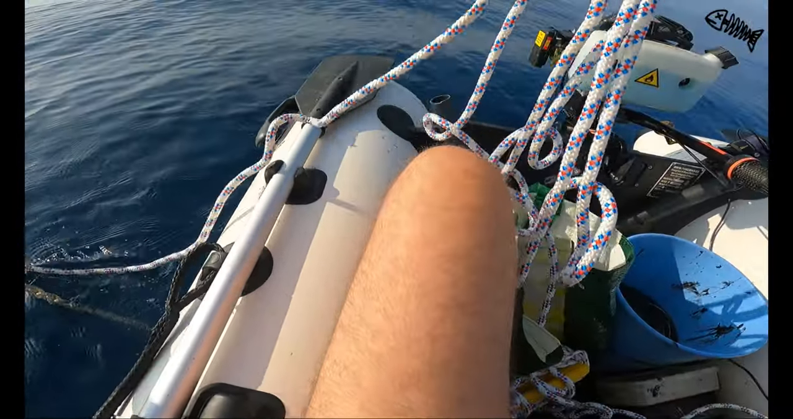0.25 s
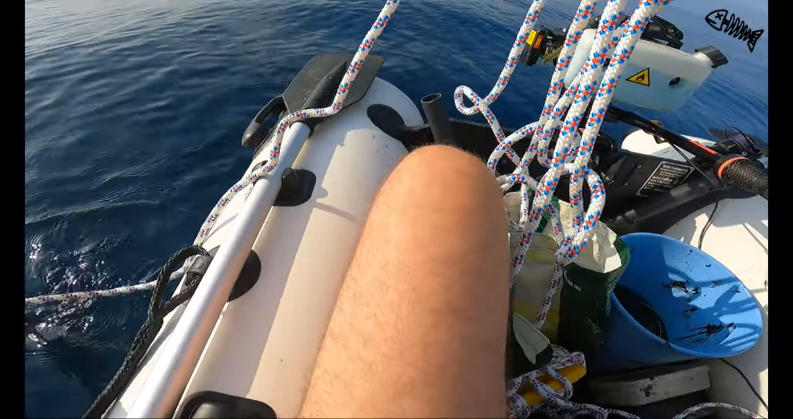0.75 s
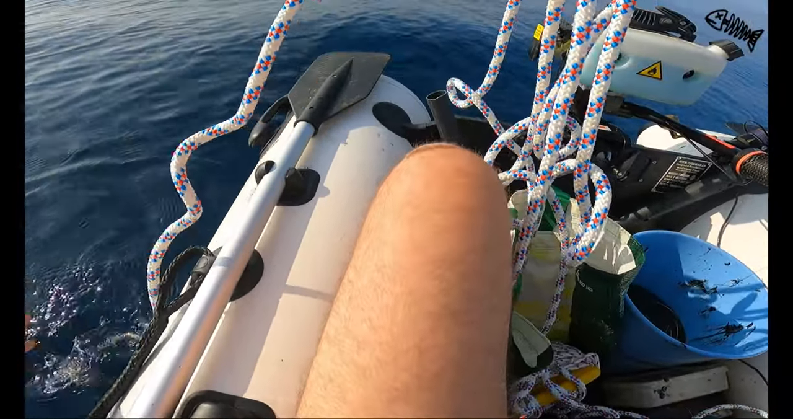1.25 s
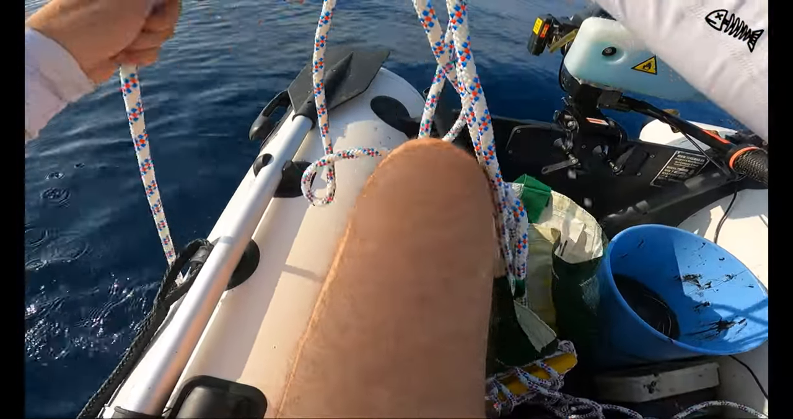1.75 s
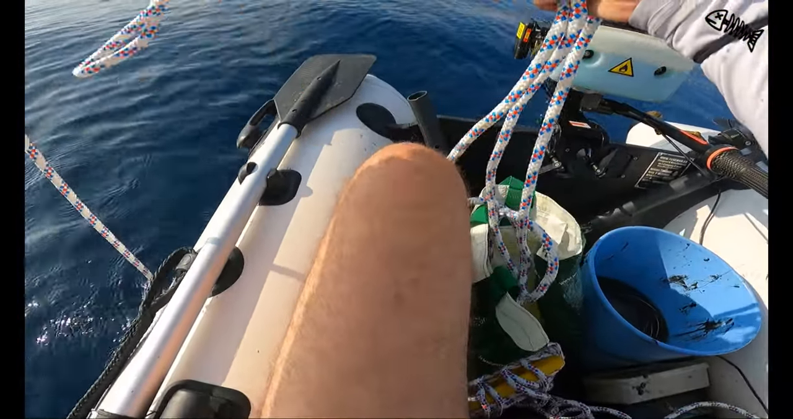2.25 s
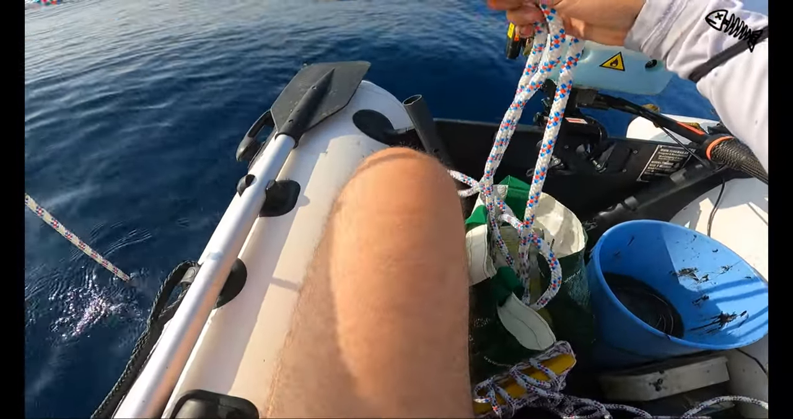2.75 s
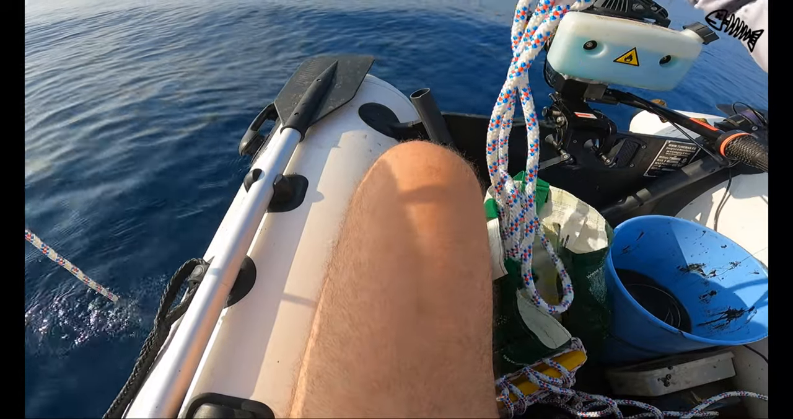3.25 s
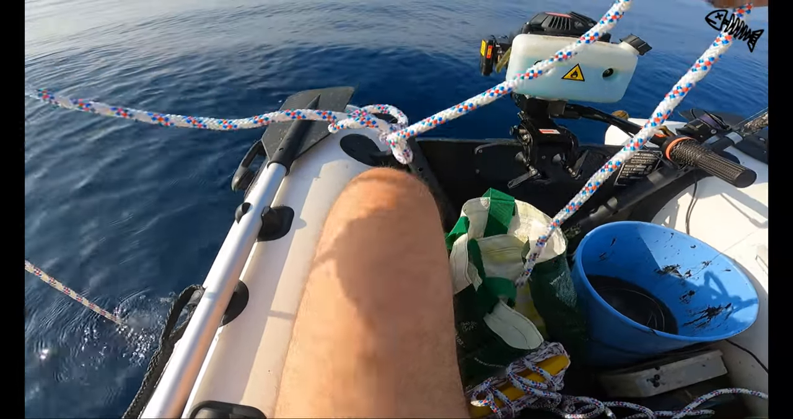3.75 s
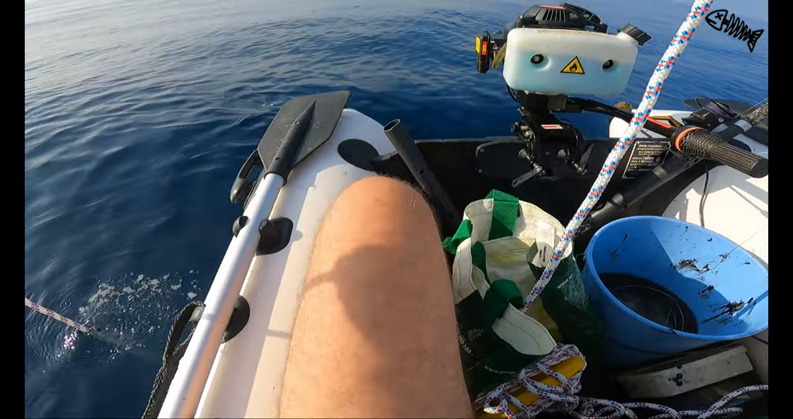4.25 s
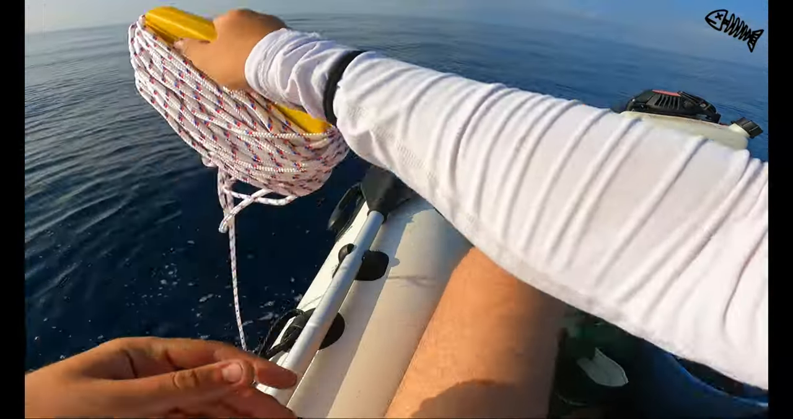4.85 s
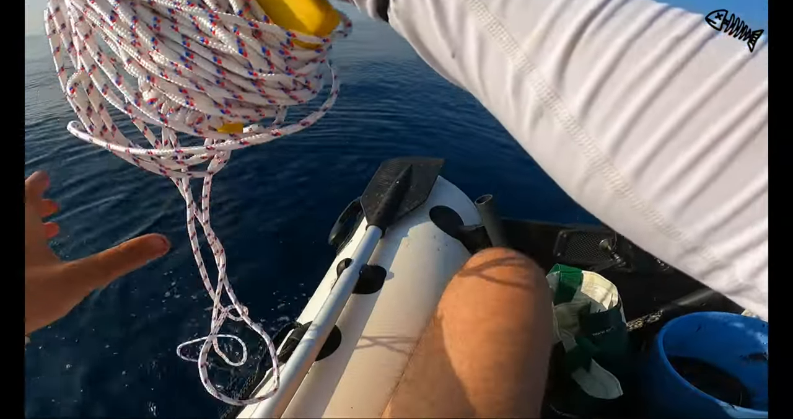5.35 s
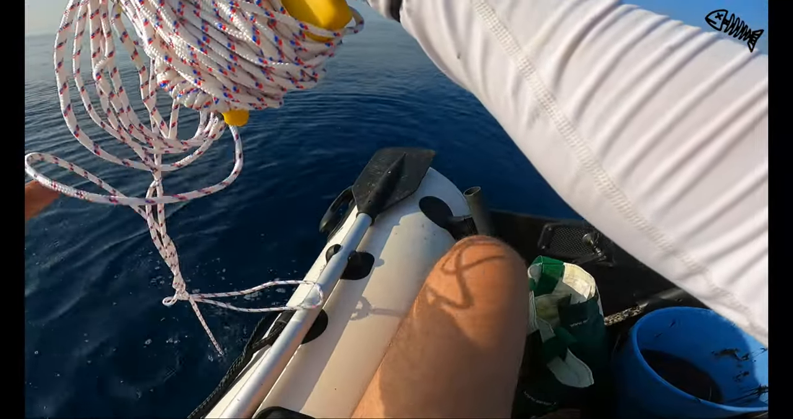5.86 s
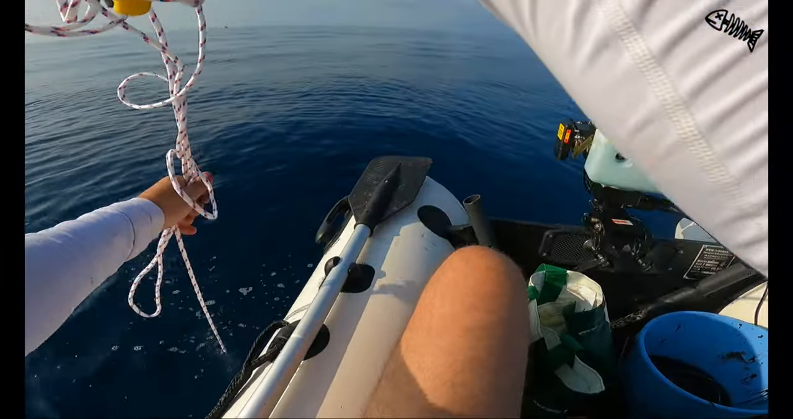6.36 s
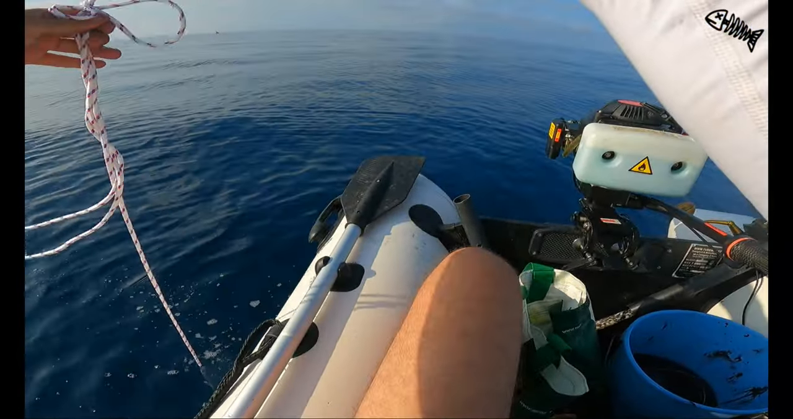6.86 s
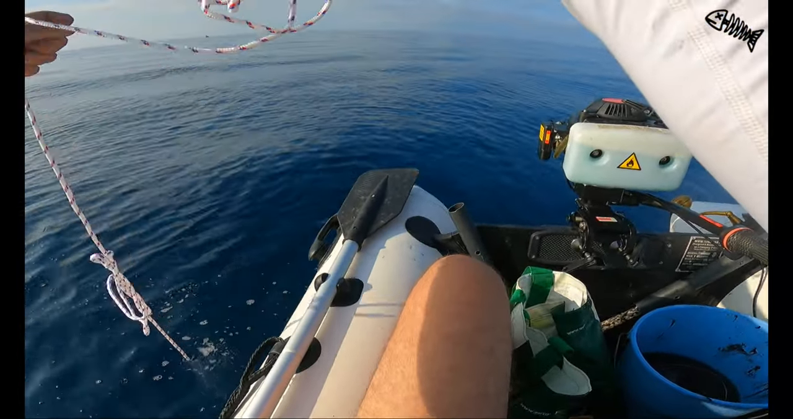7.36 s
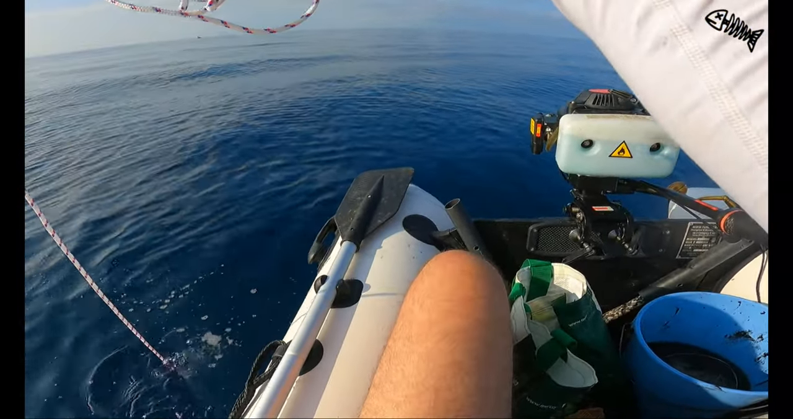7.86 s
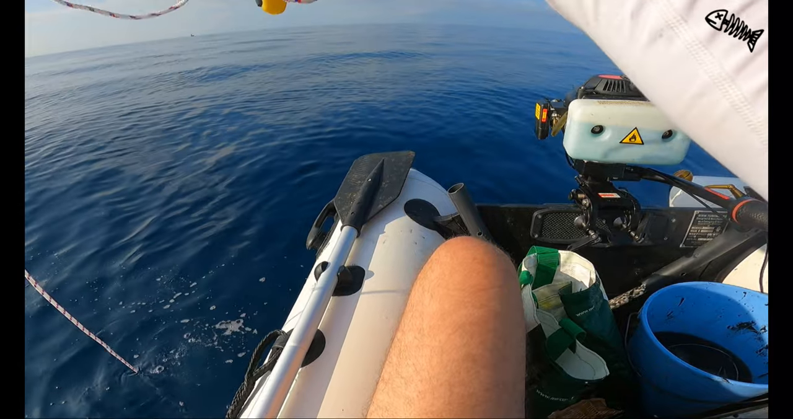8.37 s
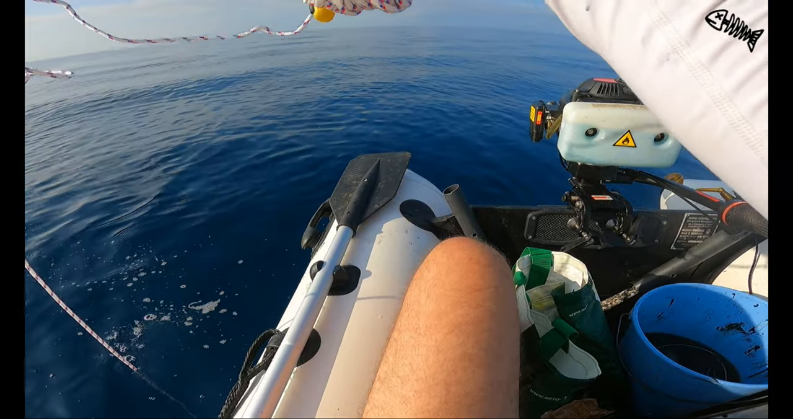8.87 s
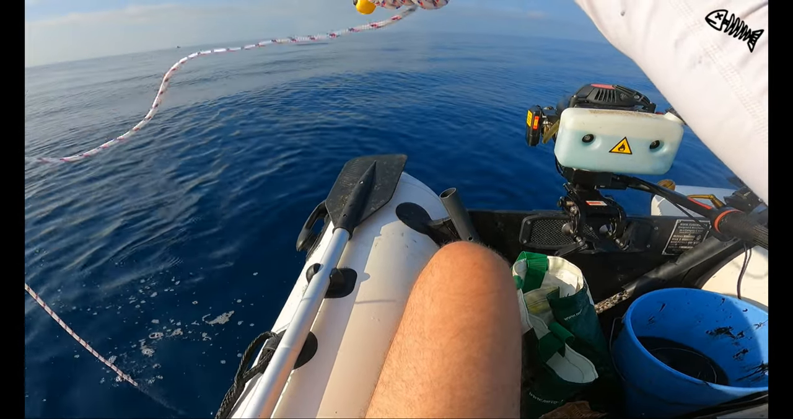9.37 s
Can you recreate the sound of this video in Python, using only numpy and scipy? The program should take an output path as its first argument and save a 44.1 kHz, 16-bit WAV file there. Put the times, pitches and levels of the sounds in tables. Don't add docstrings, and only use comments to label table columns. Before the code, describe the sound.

Close outdoor pickup on a small inflatable boat at sea, wind rumbling softly on the microphone throughout. At 0.3 s a loud, hollow rubbery thump lands with a wet slap; a sharp tick follows at 0.6, another low thump at 0.7, then a run of small plops and drips to 1.2. From 1.3 to 1.7 slaps, splashes and thumps crowd together, leading into a throaty bubbling gurgle that peaks near 1.9 and dies by 2.1. Wet rope hisses brightly from 1.8, checked briefly at 2.8, 3.9 and 4.5, with hollow washes on the hull at 3.2-3.6. Plopping splashes and a thump burst at 4.9-5.2, another at 5.6. Wind pops at 6.05 and hard at 6.5, beside a fresh hiss. Slaps and spray at 7.5-7.9, wind pops at 7.9 and strongest at 8.5, then faint rope hiss to 9.6.

```python
import sys
import numpy as np
from scipy import signal
from scipy.fft import rfft, irfft, next_fast_len
from scipy.io import wavfile
from scipy.ndimage import uniform_filter1d, map_coordinates

SR = 44100
rng = np.random.default_rng(int(sys.argv[2]) if len(sys.argv) > 2 else 0)


def log_audio(samples):
    frames = np.atleast_2d(samples).T
    limited = np.clip(frames, -1, 1)
    pcm = np.round(limited * 32767).astype(np.int16)
    wavfile.write(sys.argv[1], SR, pcm)


def amplitude_ratio(level_db):
    exponent = np.asarray(level_db, float) / 20
    return 10 ** exponent


N = 423801

# freq_hz, density_db (dB per Hz)
SLOSH_SPECTRUM = [(250, -38), (500, -6), (1000, 3.5), (1800, 3), (2600, -11.5), (5000, -63)]
# freq_hz, density_db (dB per Hz)
HULL_SPECTRUM = [(90, -15), (160, 1), (280, -4), (450, -10), (800, -25.5), (1500, -66)]
# freq_hz, correlation (0 to 1)
PORT_LIKENESS = [(60, 0.9), (180, 0.44), (550, 0.24), (1650, 0.56), (4970, 0.85), (15000, 0.55)]


def unit(x):
    return x / np.sqrt(np.mean(x ** 2) + 1e-20)


def along(points, hz):
    f, v = np.transpose(points)
    return np.interp(np.log(hz + 1), np.log(np.abs(f) + 1), v)


def curves(rows):
    s, *cols = np.transpose(rows)
    return [np.interp(np.arange(N) / SR, s, c) for c in cols]


def wobble(rate):
    knots = rng.standard_normal(int(N * 400 / SR) + 4)
    return map_coordinates(knots, [np.arange(N) * min(rate, 400) / SR])


def filtered(x, response):
    m = next_fast_len(N + SR // 2)
    return irfft(rfft(x, m) * response(np.fft.rfftfreq(m, 1 / SR)), m)[..., :N]


def rush(spectrum, alike, patchy_db):
    z = signal.stft(rng.standard_normal((2, N)), nperseg=512)[2]
    field = uniform_filter1d(rng.standard_normal(z.shape[1:]), size=5, axis=0)
    field = uniform_filter1d(field, size=10, axis=1)
    pair = signal.istft(z * amplitude_ratio(patchy_db * unit(field)), nperseg=512)[1][:, :N]

    def mid_side(hz):
        turn = np.arccos(np.clip(along(alike, hz), -1, 1)) / 2
        return amplitude_ratio(along(spectrum, hz)) * [np.cos(turn), np.sin(turn)]

    mid, side = filtered(pair, mid_side)
    return unit(np.array([mid + side, mid - side]))


def pings(s, db, hz, t60, glide, rise_cycles, size):
    t = np.arange(size) / SR
    hz, t60, db = hz[:, None], t60[:, None], db[:, None]
    slide = glide * t60 * (t / t60 - 1 + np.exp(-t / t60 * 3) / 3 + 2 / 3)
    phase = 2 * np.pi * hz * (t + slide)
    envelope = amplitude_ratio(db - 60 * t / t60) * (1 - np.exp(-t * hz / rise_cycles))
    shape = envelope * np.sin(phase - phase[:, :1])
    at = np.round(s * SR).astype(int)[:, None] + np.arange(size)
    return np.bincount(at.ravel(), shape.ravel(), N + size)[:N]


def bubbles(count, hz_mid, spread, cycles, scatter_db):
    draw = rng.random((count, 4))
    hz = hz_mid * np.exp(spread * (draw[:, 1] + draw[:, 2] - 1))
    db = -scatter_db * np.log(0.07 + draw[:, 3])
    return unit(pings(draw[:, 0] * N / SR, db, hz, cycles / hz, glide=0.14, rise_cycles=0.23, size=640))


def wind():
    # start_s, peak_db
    eddies = [(.05, -29), (.55, -31.5), (1.0, -29), (1.9, -26), (2.63, -24.5), (2.86, -31.5), (3.15, -27),
              (3.26, -19), (3.39, -26), (3.822, -31), (4.12, -32), (4.57, -21.5), (4.92, -25.5),
              (6.05, -31.5), (6.3, -29.5), (6.44, -28), (6.58, -24), (7.34, -24), (7.55, -30), (7.78, -29),
              (8.018, -19.5), (8.2, -35), (8.485, -21.5), (9.06, -34), (9.48, -31)]
    # start_s, peak_db, width_s, lean_rad (0 a push, 1 suck then push)
    pops = [
        (4.107, -19.5, 0.0024, -0.5),
        (5.956, -24, 0.0024, 4),
        (6.053, -16.5, 0.0015, 0.5),
        (6.178, -20.5, 0.0026, 1.5),
        (6.506, -5.5, 0.0016, -0.5),
        (7.938, -10, 0.002, 1),
        (8.514, -4, .0011, 1.5),
    ]
    # freq_hz, density_db (dB per Hz)
    buffet_spectrum = [(10, 0), (22, 8), (40, 3.5), (90, -7), (140, -13.5), (260, -34.5), (500, -70.5)]
    breeze_db, wake_db = -51.5, -15.5
    eddy_s, wake_s = 0.042, 0.31
    s, db = np.transpose(eddies)
    knots = np.arange(0, N / SR, 1 / 500)

    def bell(half_s):
        return np.exp(-((knots - s[:, None]) / half_s) ** 2)

    gusts = bell(eddy_s) + amplitude_ratio(2 * wake_db) * bell(wake_s)
    power = amplitude_ratio(2 * breeze_db) + np.sum(amplitude_ratio(2 * db[:, None]) * gusts, axis=0)
    buffet, = curves(np.transpose([knots, np.sqrt(power)]))
    lumps = amplitude_ratio(1.5 * wobble(25))
    out = buffet * unit(lumps * rush(buffet_spectrum, [(30, 0.87), (300, 0.99)], patchy_db=3.5))
    t = np.arange(-2048, 2048) / SR
    for start_s, peak_db, width_s, lean in pops:
        u = (t - .007) / width_s
        push = (1 - 0.26 * u ** 2) * np.cos(lean)
        suck = 0.89 * u * np.sin(lean)
        at = round(start_s * SR)
        out[:, at - 2048:at + 2048] += amplitude_ratio(peak_db + 1) * (push + suck) * np.exp(-.35 * u ** 2)
    return out


def running():
    # start_s, hiss_db, grip (0 loose, 1 tight), palm (-1 deep, 0 flat, 1 shallow cup)
    hand = [(0, -57, 0.86, -0.12), (1.45, -60.5, 1, -0.72), (1.8, -38.5, 0.42, -0.16), (2.0, -38, 1, -0.19),
            (2.45, -46, 0.88, -0.1), (3.5, -45.5, 0.66, -0.3), (4.45, -48, 0.61, -0.53),
            (4.8, -51.5, 0.69, -0.54), (5.0, -62.5, 0.23, 0.074), (5.55, -56, 0.14, -0.25),
            (6.34, -49, 0.039, 0.2), (6.42, -38.5, 0.89, -0.28), (6.8, -48, 0.41, -0.099),
            (7.2, -45.5, 0.23, 0.7), (7.8, -50, 0.049, -0.25), (8.7, -55, 0.62, -0.4),
            (9.2, -52.5, 0.94, 1), (9.61, -53.5, 0.81, 0.44)]
    # start_s, length_s, loss_db
    stops = [
        (0.178, 0.2, 6.5),
        (0.965, 0.077, 14),
        (2.824, 0.27, 11),
        (3.853, 0.24, 13.5),
        (4.2, 0.11, 6.5),
        (4.484, 0.22, 15),
        (6.414, 0.085, 13),
        (7.247, 0.074, 16.5),
        (7.854, 0.49, 20.5),
        (8.4, 0.3, 7.5),
    ]
    clamp_s, let_go_s = 0.056, 0.027
    creep = 0.79
    hiss_db, grip, palm = curves(hand)
    t = np.arange(N) / SR
    for s, length, loss_db in stops:
        creep_end = s + max(length - let_go_s, clamp_s + .001)
        held = np.interp(t, [s, s + clamp_s, creep_end, s + length], [0, 1, creep, 0])
        hiss_db = hiss_db - loss_db * held
    return hiss_db, grip, palm


def rope():
    # freq_hz, density_db (dB per Hz)
    tight_spectrum = [(600, -40), (1000, -12.5), (1700, -7), (2600, -7), (4500, -1), (7000, -7.5),
                      (12100, -19.5), (16000, -37)]
    # freq_hz, density_db (dB per Hz)
    loose_spectrum = [(530, -4), (900, -10), (1790, -21), (2890, -4), (4860, 3), (6720, 8.5), (9770, 2.5),
                      (11000, -4.5), (12100, 1), (14500, -7), (16000, -46)]
    # freq_hz, width_hz
    hollows = [(2550, 880), (4650, 2030)]
    # start_s, spacing_hz (between bright bands), bounce_db
    bounce = [
        (1.75, 2000, -9),
        (2.1, 1690, -3),
        (2.85, 1780, -3),
        (3.5, 1750, -11),
        (4.1, 2230, -4),
        (4.45, 2520, -4),
        (5.0, 2400, -20),
    ]
    hiss_db, grip, palm = running()
    rings = np.maximum(-palm, 0.14 * palm), np.maximum(palm, -.4 * palm)
    grip = np.clip(grip, 0, 1)
    tight = rush(tight_spectrum, PORT_LIKENESS, patchy_db=1.8)
    loose = rush(loose_spectrum, PORT_LIKENESS, patchy_db=1.8)
    out = np.sqrt(grip) * tight + np.sqrt(1 - grip) * loose
    spacing_hz, bounce_db = curves(bounce)
    late = np.arange(N) - SR / spacing_hz
    dulled = amplitude_ratio(bounce_db) * filtered(out, lambda f: 1 / (1 + (f / 3900) ** 4))
    out = unit(out + [map_coordinates(port, [late], order=3) for port in dulled])
    for (hz, width), ring in zip(hollows, rings):
        band = [(hz - width, -40), (hz - width / 2, -6), (hz, 0), (hz + width / 2, -6), (hz + width, -40)]
        out += ring * rush(band, PORT_LIKENESS, patchy_db=1.5)
    return amplitude_ratio(hiss_db + 1.24 * wobble(150)) * out


def water():
    # start_s, slosh_db
    stir = [(0, -56), (0.27, -67), (0.4, -52.5), (1.0, -53), (1.2, -58.5), (1.75, -42.5), (2.05, -53),
            (2.6, -63.5), (3.1, -51.5), (3.6, -48.5), (3.92, -57.5), (4.8, -50), (5.7, -62.5),
            (6.45, -49.5), (7, -62), (9.61, -71)]
    # freq_hz, density_db (dB per Hz)
    far_sea = [(900, -4), (1500, 2), (2500, -17), (10000, -2), (16000, -54)]
    slosh_db, = curves(stir)
    lap_db = -52.5 + 0.38 * (slosh_db - slosh_db.mean())
    slosh = unit(amplitude_ratio(1.65 * wobble(70)) * rush(SLOSH_SPECTRUM, [(500, 0.38)], patchy_db=3.5))
    fizz = bubbles(count=500, hz_mid=1300, spread=.8, cycles=14, scatter_db=1.5)
    lap = unit(amplitude_ratio(2.5 * wobble(40)) * rush(HULL_SPECTRUM, [(200, .65)], patchy_db=1))
    sea = amplitude_ratio(-70.0) * rush(far_sea, PORT_LIKENESS, patchy_db=3)
    return amplitude_ratio(slosh_db - 3.3) * (slosh + .35 * fizz) + amplitude_ratio(lap_db) * lap + sea


def tube():
    # start_s,
    # peak_db, pitch_hz
    thumps = [(0.072, -29.5, 342), (0.295, 0, 235), (0.498, -37, 378), (0.73, -17.5, 300), (1.38, -32, 444),
              (1.671, -23.5, 375), (5.62, -53, 304), (0.72, -6.5, 169), (1.414, -10.5, 240),
              (1.445, -14.5, 414), (1.585, -16, 293), (1.656, -17.5, 326), (1.705, -19.5, 350),
              (1.753, -15.5, 340), (1.833, -6.5, 275), (1.947, -16, 325), (2.335, -28.5, 198),
              (2.625, -29.5, 204), (2.996, -32, 190), (3.223, -24, 170), (3.279, -21.5, 280),
              (3.482, -28, 265), (4.007, -32, 181), (4.149, -33.5, 313), (4.554, -37, 161),
              (5.908, -40, 304), (6.359, -35.5, 334), (7.623, -37.5, 293), (8.19, -38.5, 183),
              (8.747, -35.5, 175), (2.093, -31.5, 288), (4.946, -10.5, 435), (5.068, -21, 333),
              (5.5958, -18, 387), (5.791, -32.5, 297), (5.852, -35.5, 314), (7.479, -28.5, 550),
              (7.746, -32.5, 460), (7.918, -20, 363)]
    s, db, hz = np.transpose(thumps)
    t60 = np.clip(0.018 * (1.5 - 0.0051 * db), .01, .2)
    skin = pings(s, db + 8.5, 1.275 * hz, t60, glide=-0.53, rise_cycles=0.56, size=6144)
    skin = filtered(skin, lambda f: (1j * f / (1j * f + 95)) ** 2)
    t = np.arange(8192) / SR
    shake = np.zeros(N + len(t))
    for at, level, life in zip(s, db, t60):
        decay = amplitude_ratio(level - 60 * t / (6 * life))
        shake[round(at * SR):][:len(t)] += decay * (1 - np.exp(-t / 0.00152))
    boom = unit(filtered(rng.standard_normal(N), lambda f: amplitude_ratio(along(HULL_SPECTRUM, f))))
    return skin + amplitude_ratio(-12.0) * shake[:N] * boom


def drops():
    # start_s, peak_db, pitch_hz
    plop_rows = [(0.717, -22.5, 970), (0.962, -25.5, 740), (1.246, -28.5, 1750), (1.267, -19, 1040),
                 (1.378, -17.5, 1990), (1.504, -21.5, 970), (1.526, -22, 1110), (1.642, -23.5, 2540),
                 (2.382, -39.5, 1140), (2.675, -39, 1160), (2.83, -37.5, 510), (3.274, -23, 1250),
                 (4.947, -10, 650), (4.976, -16.5, 1115), (4.984, -15.5, 807), (5.0003, -11, 1560),
                 (5.05, -20, 1850), (5.204, -27, 1880), (5.527, -31.5, 1980), (7.653, -39.5, 706)]
    # start_s, peak_db, pitch_hz
    slap_rows = [(0.073, -22, 1150), (0.293, -10.5, 565), (0.593, -20.5, 2490), (0.7, -32, 1400),
                 (0.825, -30.5, 1110), (0.875, -32, 3260), (1.348, -16.5, 1070), (1.407, -12.5, 1760),
                 (1.615, -13, 2080), (3.603, -12, 1890), (4.15, -29, 1720), (4.66, -28.5, 1520),
                 (4.869, -23.5, 1070), (5.014, -9, 2340), (5.184, -22, 2390), (5.5766, -16, 1900),
                 (6.492, -25, 1730), (7.479, -11.5, 900), (7.805, -18, 1250), (7.831, -14, 2200),
                 (7.897, -18.5, 1480)]
    # start_s, peak_db, pitch_hz
    link_rows = [(0.582, -42, 1060), (0.624, -30, 840), (0.652, -31, 806), (0.684, -39, 800),
                 (0.729, -24.5, 1020), (0.772, -38, 705), (0.796, -34, 720), (0.856, -28, 556),
                 (0.934, -31, 735), (1.039, -40, 780), (1.066, -36.5, 870), (1.11, -41, 1150),
                 (1.14, -45, 750), (1.162, -35.5, 950), (1.204, -36.5, 784), (1.268, -28, 623),
                 (1.288, -28.5, 674)]
    # start_s, peak_db, pitch_hz
    tick_rows = [(0.4086, -29, 8500), (0.6231, -41, 7350), (0.7, -34, 6740), (0.7173, -29, 6940),
                 (1.0282, -34, 9050), (3.603, -15, 5100), (6.492, -26, 3000), (0.168, -24, 6300),
                 (0.466, -26.5, 5000), (0.5941, -5.5, 4750), (0.707, -33, 6500), (0.747, -28, 7500),
                 (0.7534, -31, 4300), (0.765, -24.5, 7400), (0.835, -33, 8950), (0.8493, -20, 7000),
                 (0.9621, -26.5, 2920), (1.077, -21, 2300), (1.113, -25, 3500), (1.108, -33, 4970),
                 (1.125, -29, 4600), (1.228, -29, 6500), (1.1827, -22, 5200), (1.2135, -25.5, 4600),
                 (1.259, -20.5, 2400), (1.415, -11, 2700), (1.552, -18, 3370), (1.5834, -11, 3830),
                 (1.6726, -17.5, 6600), (5.116, -29, 2800), (5.163, -26, 3500), (5.222, -18, 2580),
                 (5.38, -25.5, 3580), (5.397, -25, 2880), (5.6209, -13, 3150), (5.6665, -27, 4800),
                 (7.694, -26, 2770), (7.7102, -17.5, 8650), (7.739, -21.5, 6900), (7.855, -22, 3920),
                 (7.9112, -7, 6740), (8.1295, -29, 5370), (8.1718, -33.5, 5430)]
    s, db, hz = np.transpose(plop_rows + slap_rows + link_rows)
    t60 = .045 * (800 / hz) ** .35
    t60[len(plop_rows):][:len(slap_rows)] *= .4
    t60 = np.clip(t60, .006, .06)
    plops = pings(s, db - 0.5, .95 * hz, t60, glide=0.1, rise_cycles=0.15, size=1536)
    out = np.array([plops, plops])
    t = np.arange(1024) / SR
    splash = np.zeros(N + len(t))
    for at, level in zip(s, db):
        splash[round(at * SR):][:len(t)] += amplitude_ratio(level - 60 * t / 0.014)
    wash = unit(filtered(rng.standard_normal(N), lambda f: amplitude_ratio(along(SLOSH_SPECTRUM, f))))
    out += amplitude_ratio(-6.5) * splash[:N] * wash
    slap_ticks = [(s + 0.00125, db - 8, 2120 + 0.88 * hz) for s, db, hz in slap_rows]
    s, db, hz = np.transpose(tick_rows + slap_ticks)
    pan_db = 4 * rng.standard_normal((len(s), 1))[:, 0]
    spray = np.zeros((2, N + len(t)))
    for at, level, lean, pitch_hz in zip(s, db, pan_db, hz):
        burst = amplitude_ratio(level + 0.14 * (level - 0.5) - 60 * t / 0.013) * rng.standard_normal(len(t))
        dulling = (1 + 1j * np.fft.rfftfreq(len(t), 1 / SR) / (1.85 * pitch_hz)) ** 2
        burst = irfft(rfft(burst) / dulling)
        spray[:, round(at * SR):][:, :len(t)] += burst * amplitude_ratio(np.array([[lean / 2], [-lean / 2]]))
    bright = filtered(spray[:, :N], lambda f: 1 / (1 + (2200 / (f + 1)) ** 4) / (1 + (f / 13000) ** 3))
    ring = pings(s, db - 1.5, hz, 25 / hz, glide=0.016, rise_cycles=0.4, size=512)
    return out + ring + amplitude_ratio(-2) * bright


def beads():
    # start_s, peak_db, pitch_hz
    flung = [(5.5958, -17, 800), (4.79, -26, 447), (4.503, -33, 480), (0.172, -37.5, 1310),
             (0.497, -34, 1000), (1.03, -37, 3240), (5.001, -23, 3800), (1.329, -31, 2050),
             (1.349, -31, 4100), (0.732, -34.5, 3270), (1.287, -23, 1040), (1.349, -12, 1650),
             (1.404, -25, 1110), (1.408, -19.5, 3750), (1.416, -13, 2150), (1.424, -27, 3800),
             (1.432, -21, 2530), (1.445, -23, 3800), (1.456, -34, 2400), (1.505, -22, 1690),
             (1.524, -30, 4570), (1.561, -25, 4500), (1.576, -28, 2570), (1.592, -24, 2270),
             (1.619, -18.5, 4750), (4.941, -18, 2520), (4.96, -28, 5600), (5.009, -15, 1550),
             (5.027, -22, 5300), (5.031, -18.5, 885), (5.074, -18.5, 1060), (5.169, -31, 1310),
             (5.18, -27, 1800), (5.203, -33, 4700), (5.237, -38, 2500), (5.261, -35, 3480),
             (5.333, -37, 2460), (5.357, -36, 4860), (5.41, -37, 2030), (5.418, -36, 3900),
             (5.428, -37, 7000), (5.45, -38, 9200), (5.561, -32, 1700), (5.576, -16.5, 5880),
             (5.588, -21, 3030), (5.588, -33, 2100), (5.6026, -18.5, 1950), (5.7094, -38, 4950),
             (7.479, -19, 2730), (7.756, -36, 4530), (7.786, -34, 608), (7.787, -36, 3500),
             (7.8, -29, 3940), (7.875, -31, 4100), (7.884, -28, 1900), (7.897, -21, 550),
             (7.9105, -10.5, 1430)]
    # start_s, peak_db, pitch_hz
    singers = [(2.96, -43.5, 1180), (3.764, -40, 1900), (4.483, -37, 1380), (4.589, -41, 1500),
               (4.633, -39, 1490), (4.718, -35.5, 1550), (4.79, -34, 1000), (5.853, -39.5, 1060),
               (6.076, -45, 1100), (8.132, -43, 2120), (8.15, -48, 1420), (8.417, -49, 940),
               (0.962, -30, 965), (1.394, -27, 2000), (1.396, -24, 1100), (1.424, -24, 1750),
               (1.432, -27, 1090), (1.441, -24, 1230), (1.532, -26, 1600), (1.536, -27, 2600),
               (1.54, -26, 1110), (1.684, -32, 2020), (2.327, -48, 480), (2.507, -38.5, 457),
               (2.943, -38, 520), (3.061, -38, 380), (5.026, -20, 2050), (5.043, -25, 1870),
               (5.057, -28, 1940), (5.118, -42, 2750), (5.134, -45, 2920), (5.218, -30, 1870),
               (5.528, -39, 4600), (5.534, -31, 1960), (5.553, -37, 4740), (7.84, -37, 770),
               (7.925, -31, 666), (7.947, -38, 1740), (7.969, -32, 611), (7.985, -34, 640),
               (8.01, -30.5, 550), (8.04, -42, 625)]
    out = np.zeros(N)
    for rows, t60_s in ((flung, 0.011), (singers, 0.031)):
        s, db, hz = np.transpose(rows)
        t60 = np.clip(t60_s * (1500 / hz) ** 0.27, .004, .07)
        out += pings(s, db + 2, hz, t60, glide=0.064, rise_cycles=0.67, size=2048)
    return out


def splashes():
    # start_s, length_s,
    # level_db, spray_db (relative)
    open_rows = [(0.398, 0.054, -42.5, -4.5), (1.239, 0.087, -45.5, 0), (1.337, 0.039, -33.5, -5.5),
                 (1.509, 0.055, -34.5, -17), (1.556, 0.12, -39, 0.5), (1.806, 0.039, -58.5, 23.5),
                 (1.876, 0.22, -59, 20.5), (4.787, 0.055, -45, 1.5), (5.003, 0.1, -36.5, -1.5),
                 (5.111, 0.055, -56.5, 8), (5.17, 0.087, -44.5, 1), (5.329, 0.14, -73.5, 23.5),
                 (5.572, 0.068, -43.5, 0.5), (7.728, 0.096, -51, 3.5), (7.788, 0.16, -44, -4),
                 (7.915, 0.01, -34, -3), (7.927, 0.16, -56, -32)]
    # start_s, length_s, level_db, hull_db (relative)
    hull_rows = [
        (0.286, 0.11, -43.5, 10),
        (1.392, 0.084, -32, 4.5),
        (3.215, 0.097, -44, 4),
        (3.361, 0.08, -37.5, 9.5),
        (3.45, 0.078, -46.5, 2),
        (3.545, 0.12, -35.5, 6),
        (4.869, 0.019, -38, 5),
        (4.946, 0.072, -35, 0.5),
        (7.91, 0.23, -66, 17),
    ]
    # freq_hz, density_db (dB per Hz)
    spray_spectrum = [(1500, -20), (2600, 6.5), (4000, 8), (7000, 6), (12000, -6), (16000, -36)]
    # freq_hz, density_db (dB per Hz)
    wash_spectrum = [(100, -24), (200, -1.5), (400, -4), (700, -14), (1100, -56), (2000, -57)]
    t = np.arange(N) / SR
    gains = np.zeros((3, N))
    in_open = [(*row, -5.5) for row in open_rows]
    at_hull = [(s, length, db, -1 - 0.77 * hull_db, hull_db) for s, length, db, hull_db in hull_rows]
    for s, length, db, spray_db, hull_db in in_open + at_hull:
        near = slice(round((s - .01) * SR), round((s + length) * SR))
        times = [s - .003, s, s + 0.63 * length, s + length]
        shape = np.interp(t[near], times, [0.33, 1.0, 1.0, 0])
        gains[:, near] += shape * amplitude_ratio(db + np.array([[0], [spray_db], [hull_db]]))
    clumps = 5 * wobble(130)
    body = unit(amplitude_ratio(clumps) * rush(SLOSH_SPECTRUM, [(500, 0.6)], patchy_db=0.5))
    body = body + 2.1 * bubbles(count=1600, hz_mid=1400, spread=1.1, cycles=11, scatter_db=4)
    spray_lumps = amplitude_ratio(.8 * clumps + 3 * wobble(300))
    spray = unit(spray_lumps * rush(spray_spectrum, [(3000, .9)], patchy_db=2.5))
    spray = spray + 1.1 * bubbles(count=3000, hz_mid=3600, spread=.7, cycles=11, scatter_db=3)
    hull = unit(amplitude_ratio(0.46 * clumps) * rush(wash_spectrum, [(300, 1.0)], patchy_db=6.0))
    return gains[0] * unit(body) + gains[1] * unit(spray) + gains[2] * hull


def necks():
    # start_s, length_s, from_hz, to_hz, level_db
    closings = [
        (0.96, 0.105, 940, 3300, -48.5),
        (5.115, 0.052, 940, 1250, -48),
        (5.518, 0.022, 1650, 1950, -41),
        (5.258, 0.024, 1700, 2900, -48),
        (5.258, 0.034, 1050, 1950, -51),
    ]
    out = np.zeros(N)
    for s, length, from_hz, to_hz, db in closings:
        u = np.arange(round(length * SR)) / (length * SR)
        hz = from_hz * (to_hz / from_hz) ** (u ** 2.5)
        envelope = np.sqrt(np.sin(np.pi * u)) * 1.7 * (1 - 0.96 * u)
        tone = np.sin(2 * np.pi * np.cumsum(hz) / SR)
        out[round(s * SR):][:len(u)] += amplitude_ratio(db) * envelope * tone
    return out


def gurgle():
    # start_s, level_db
    plume = [
        (1.52, -56),
        (1.6, -30),
        (1.645, -49),
        (1.67, -43),
        (1.74, -35.5),
        (1.77, -27.5),
        (1.865, -29.5),
        (1.91, -22.5),
        (2.02, -37.5),
    ]
    # freq_hz, width_hz, level_db
    cavities = [(272, 71, 7.5), (415, 21, 1), (499, 43, 0.5), (763, 210, -11)]
    before = [(plume[0][0] - .03, -110)]
    after = [(plume[-1][0] + 0.084, -110)]
    level_db, = curves(before + list(plume) + after)
    bursts = amplitude_ratio(3.8 * wobble(60)) * rng.standard_normal(N)

    def dull_resonance(f):
        total = 0
        for k, (c, w, db) in enumerate(cavities):
            total = total + (-1) ** k * amplitude_ratio(db) * 1j * f * w / (c * c - f * f + 1j * f * w)
        return total / (1 + (f / 1050) ** 6) / (1 + (150 / (f + 1)) ** 4)

    sound = filtered(bursts, dull_resonance)
    live = level_db > -100
    return amplitude_ratio(level_db + 4.5) * sound / np.std(sound[live])


def pockets():
    # start_s, length_s, pitch_hz, peak_db
    throbs = [
        (1.757, 0.068, 384, -19),
        (1.873, 0.019, 295, -14),
        (1.897, 0.045, 275.3, -10),
        (1.972, 0.046, 262, -25.5),
    ]
    out = np.zeros(N)
    uneven = amplitude_ratio(1.5 * wobble(90))
    for s, length, hz, db in throbs:
        u = np.arange(round(length * SR)) / (length * SR)
        sagging_hz = hz * (1 - 0.038 * (u - .5))
        phase = 2 * np.pi * np.cumsum(sagging_hz) / SR
        throb = np.sin(phase) + amplitude_ratio(-11) * np.cos(2 * phase)
        out[round(s * SR):][:len(u)] += amplitude_ratio(db) * np.sin(np.pi * u) ** 0.42 * throb
    return uneven * out


def scene():
    handling = wind() + rope() + water() + splashes()
    return handling + gurgle() + tube() + drops() + beads() + necks() + pockets()


def low_pass(x):
    return signal.sosfilt(signal.butter(12, 15830, fs=SR, output="sos"), x)


def record(dry):
    # freq_hz, difference_db
    port_difference = [(60, -5), (150, -1.5), (380, -2), (950, -1), (2400, 2.5), (6000, 2.5), (10000, 3),
                       (13000, 9)]

    def ports(hz):
        lean = amplitude_ratio(along(port_difference, hz) / 2 * np.array([[1], [-1]]))
        return lean / (1 + (hz / 14000) ** 12) * (hz < 15830)

    def housing(hz):
        return amplitude_ratio(-3 * np.exp(-((hz - 8450) / 390) ** 2))

    x = filtered(dry, lambda hz: ports(hz) * housing(hz))
    mix = x / (1 + np.abs(x / .97) ** 8) ** (1 / 8)
    return low_pass(mix)


dry = scene()
out = record(dry)
log_audio(out)
```